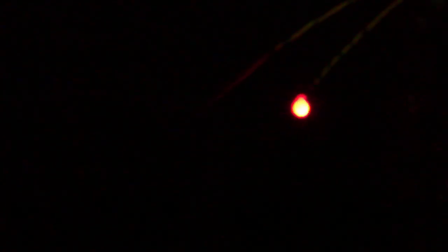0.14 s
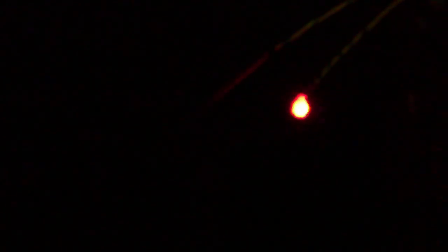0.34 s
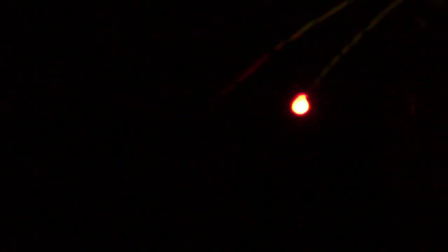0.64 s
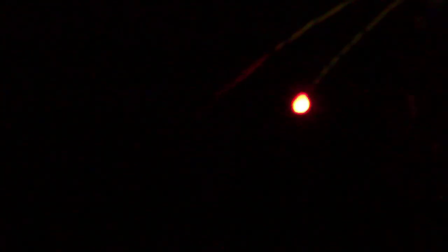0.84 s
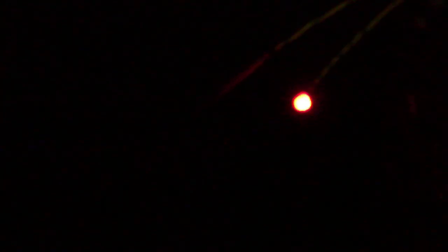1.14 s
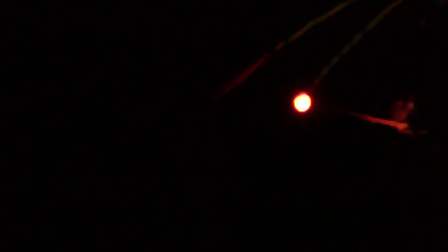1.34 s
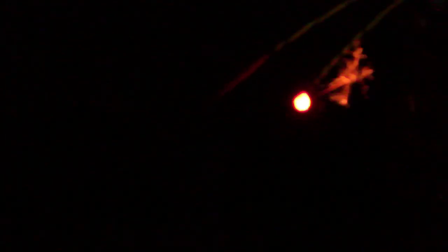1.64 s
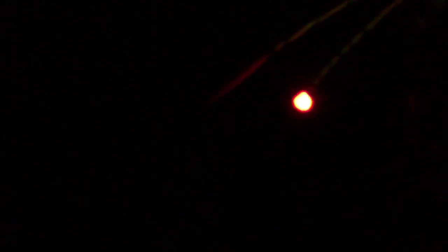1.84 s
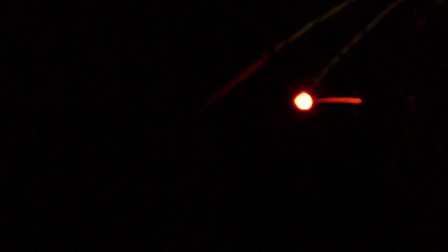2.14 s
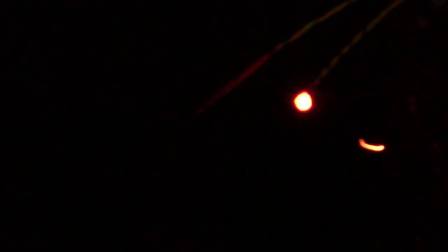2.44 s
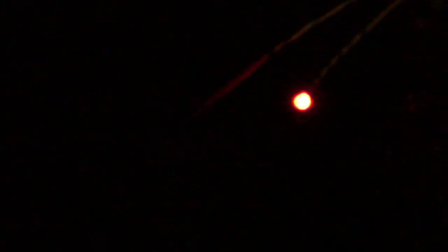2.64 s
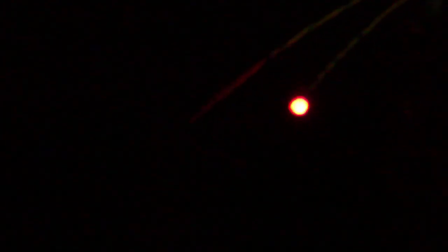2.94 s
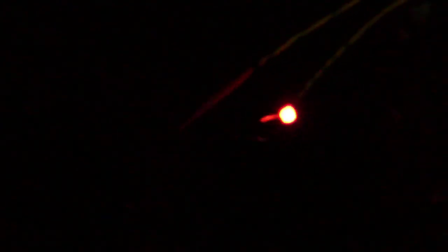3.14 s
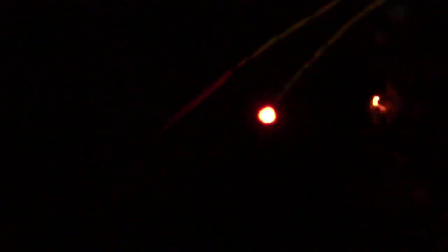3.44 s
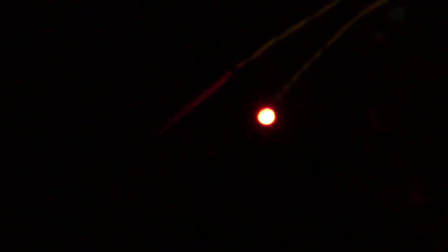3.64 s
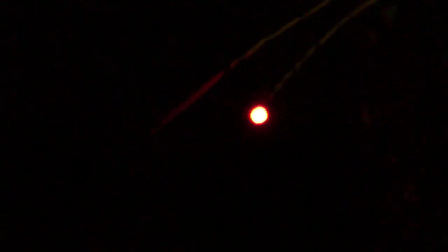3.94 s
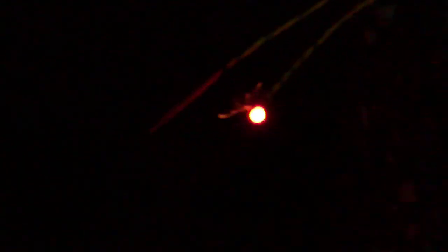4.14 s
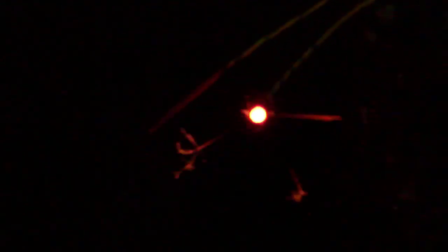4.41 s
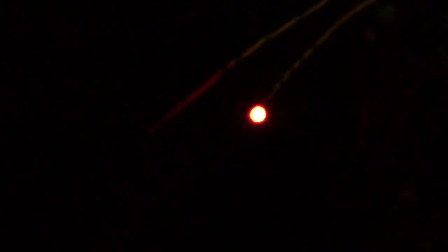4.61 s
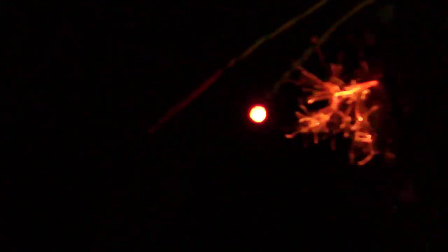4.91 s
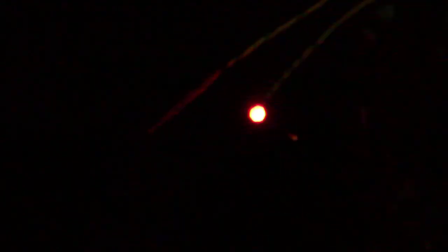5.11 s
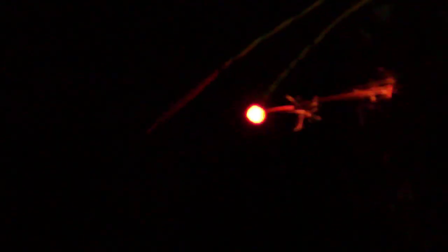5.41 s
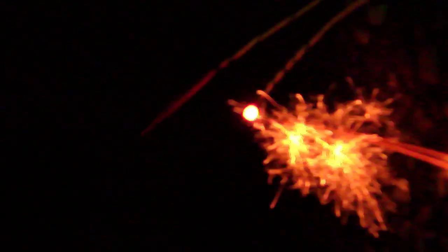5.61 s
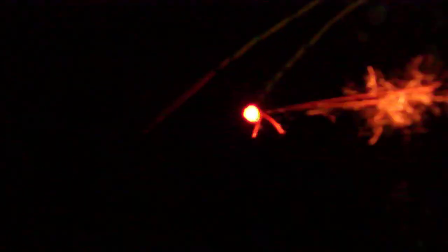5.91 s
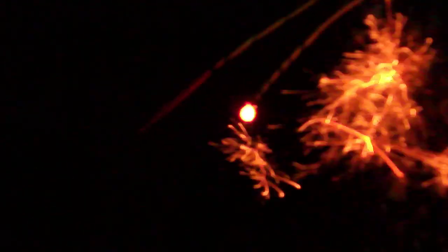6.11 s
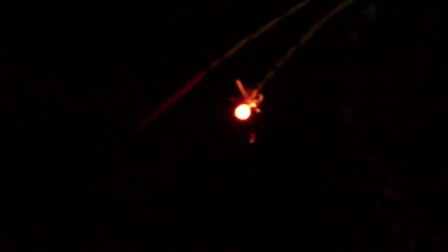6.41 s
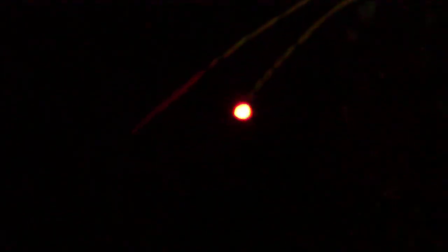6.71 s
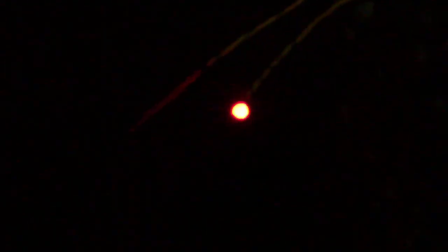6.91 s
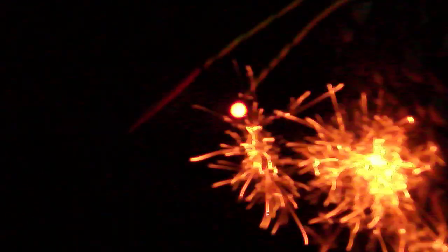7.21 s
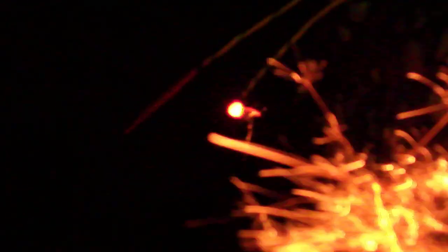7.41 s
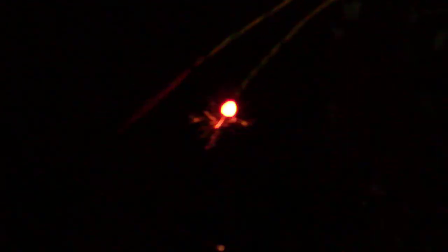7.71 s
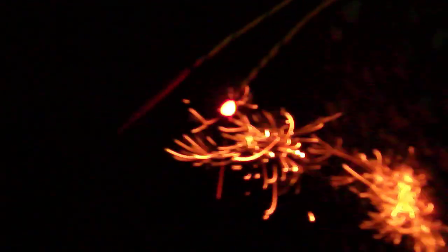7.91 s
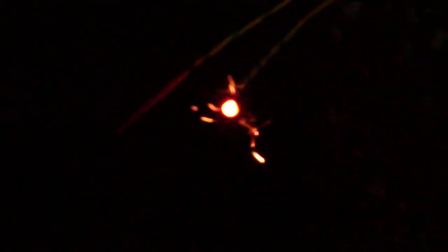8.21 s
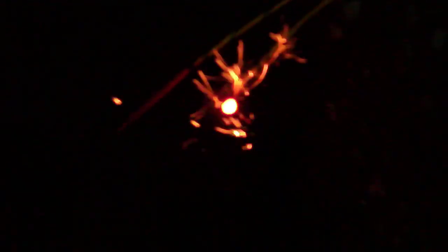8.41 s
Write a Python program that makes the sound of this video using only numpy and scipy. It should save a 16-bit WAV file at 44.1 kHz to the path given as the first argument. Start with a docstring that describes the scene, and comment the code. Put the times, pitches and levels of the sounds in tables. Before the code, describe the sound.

Deep town rumble and gentle hiss run throughout, with faint machine hums, an almost inaudible electronic whine and a distant engine dropping in pitch before twice picking up. Close to the stereo microphone, a handheld sparkler gives scattered crackling spurts, then much denser, louder ones, strongest a little past the middle. Small dull handling-like knocks and rare tiny ticks punctuate it; the bead's thin sizzle rises late. Open air, almost no echo.

```python
"""A thread sparkler burns close by, outdoors at night, heard in stereo through two microphone ports.
From the start the town rumbles under a hiss, with machine hums, a distant engine and a thin electronic whine:
shaped noise and wandering sines. The bead's quiet sizzle of short puffs grows late on; lone bubbles tick.
Soon droplets burst into showers, clumps of random snaps that swell and burn out; they crowd in after 3 s.
A few damped knocks fall between, and the engine slows, then twice picks up again."""
import sys
import numpy as np
from scipy import signal
from scipy.fft import rfft, irfft
from scipy.io import wavfile
from scipy.ndimage import uniform_filter1d

SR = 44100
rng = np.random.default_rng(int(sys.argv[2]) if len(sys.argv) > 2 else 0)


def dump_mix(stems):
    """Bounce the given channels to the path in sys.argv[1] as a 16-bit WAV at rate SR."""
    frames = np.atleast_2d(stems).T  # one column per channel
    limited = np.clip(frames, -1, 1)  # hard clip at full scale
    pcm = np.round(limited * 32767).astype(np.int16)
    wavfile.write(sys.argv[1], SR, pcm)


N = 377055
TIME, FREQS = np.arange(N) / SR, np.fft.rfftfreq(N, 1 / SR)  # s, Hz

# treble colour of sparks, sizzle and ticks: [frequency_hz, relative_density_db]
FIZZ_COLOUR = [(3300, -34), (4300, -14), (4900, -4.5), (6100, .5), (6900, -2), (8000, 1), (9000, -6.5),
               (10000, -7.5), (11000, -13), (12500, -17.5), (14500, -21.5), (15800, -26)]


def amp(db):
    """Decibels to amplitude."""
    return 10 ** (np.asarray(db) / 20)


def unit(x):
    """Scale a sound to an rms of 1."""
    return x / np.sqrt(np.mean(x ** 2) + 1e-20)


def read(points, hz):
    """A spectrum, joined by straight lines on a log-frequency axis."""
    f, value = np.transpose(points)
    return np.interp(np.log(hz + 1), np.log(f + 1), value)


def curve(rows, axis=1):
    """One column of a table of times, at every sample."""
    rows = np.asarray(rows)
    return np.interp(TIME, rows[:, 0], rows[:, axis])


def add(mix, start_s, sound):
    """Lay a sound into the mix, cut where the mix ends."""
    part = mix[max(round(start_s * SR), 0):][:len(sound)]
    part += sound[:len(part)]


def noise(gain):
    """Noise of rms 1 with the given gain at each frequency."""
    return unit(irfft(rfft(rng.standard_normal(N)) * gain, N))


def drift(hz):
    """Slow random wander of rms 1, mostly below the given rate."""
    return noise(1 / (1 + (FREQS / hz) ** 4))


def colour(x, points, size=2048):
    """A causal minimum-phase filter of energy 1: clicks keep their sharp fronts."""
    hz = abs(np.fft.fftfreq(size, 1 / SR))
    log_gain = np.log(amp(read(points, hz)))
    spectrum = np.exp(signal.hilbert(log_gain).conj())
    ring = np.fft.ifft(spectrum).real[:size // 2]
    return signal.oaconvolve(x, ring / np.linalg.norm(ring))[:N]


def snaps(per_s, spread_db, size=N):
    """Pops at random moments, of either sign and uneven size, with mean power 1."""
    height = amp(spread_db * np.minimum(rng.exponential(1, size), 4))
    sign = rng.choice([-1., 1.], size)
    return unit(height * sign * (rng.random(size) < per_s / SR))


def tones(rows, waver_db):
    """Sines whose pitch wanders over their width while their level wavers together."""
    out = np.zeros(N)
    for hz, db, width_hz in rows:
        phase = 2 * np.pi * np.cumsum(hz + width_hz / 2 * drift(width_hz)) / SR
        out += np.sqrt(2) * amp(db) * np.sin(phase)
    return out * amp(waver_db * drift(3.9))


def rumble(trim_db=3.5, swell_db=0.74):
    """The town's low rumble: bass-heavy noise that settles early, then nearly holds, swelling at random."""
    # colour of the town: [frequency_hz, relative_density_db]
    rumble_colour = [(12, -16), (25, -5), (45, -0.5), (70, -4), (100, -4.5), (130, -11), (165, -9),
                     (200, -10.5), (280, -17), (400, -22), (700, -27.5), (1100, -30.5), (1600, -41),
                     (2500, -65)]
    # level before the trim: [time_s, level_db]
    rumble_level = [(0, -38.7), (.8, -41), (4.5, -43), (8.55, -43.3)]
    level_db = trim_db + curve(rumble_level) + swell_db * drift(5.5)
    return amp(level_db) * noise(amp(read(rumble_colour, FREQS)))


def hiss(waver_db=0.39):
    """Soft broadband noise that sinks slowly, with a slight waver."""
    # colour of the hiss: [frequency_hz, relative_density_db]
    hiss_colour = [(900, -10), (1500, 0.9), (2200, 2.5), (3000, -2), (3800, -8), (4400, -13), (5500, -12.5),
                   (6700, -14), (7400, -7), (8600, -12), (9800, -7), (11000, -17), (12500, -24),
                   (15800, -30)]
    # slow fall before the waver: [time_s, level_db]
    hiss_level = [(0, -55), (1.5, -57), (8.55, -58.5)]
    level_db = curve(hiss_level) + waver_db * drift(11)
    return amp(level_db) * noise(amp(read(hiss_colour, FREQS)))


def engine(trim_db=-0.6, octave_db=-22):
    """Distant engine: only the firing note and a trace of its octave carry this far."""
    # firing note, easing off and twice picking up; level before the trim: [time_s, pitch_hz, level_db]
    engine_course = [(0, 54.37, -32), (.95, 52.98, -30.5), (1.33, 41.7, -27.5), (2.5, 38.02, -29.5),
                     (3.1, 30, -46), (4.0, 27, -46), (4.5, 38, -43.5), (5.65, 40, -43), (5.8, 46.03, -33.5),
                     (6.2, 60.48, -35), (6.8, 44.96, -32.5), (7.4, 36, -44), (7.8, 49.03, -33),
                     (8.15, 54.77, -33.5), (8.55, 56.3, -32.5)]
    phase = 2 * np.pi * np.cumsum(curve(engine_course)) / SR
    note = np.sin(phase) + amp(octave_db) * np.sin(2 * phase)
    return np.sqrt(2) * amp(trim_db + curve(engine_course, axis=2)) * note


def hums():
    """Far machines: low tones that wander in pitch and waver in level."""
    # machine tones before the waver: [pitch_hz, level_db, width_hz]
    hum_tones = [(29.2, -46.5, 2), (45.1, -42, 3.9), (219, -56.5, 6.1), (301, -58.5, 5.98)]
    return tones(hum_tones, waver_db=2.0)


def whine():
    """Electronics: thin, high tones, nearly even in level."""
    # electronic tones before the waver: [pitch_hz, level_db, width_hz]
    whine_tones = [(6143, -80, 20), (9022, -77, 6), (9092, -78, 10), (11367, -70, 1), (11397, -79.5, 12),
                   (11400, -82, 90)]
    return tones(whine_tones, waver_db=0.4)


def sizzle(puffs_per_s=55, puff_s=.0016, spread_db=1.5, steady_power=0.31):
    """Tiny droplets burn out in a single short puff each, over a steady bed of fine snaps."""
    # growth as the bead burns down, before the steady bed and the band trims: [time_s, level_db]
    sizzle_level = [(0, -69), (3, -68.5), (7.6, -64.5), (8.1, -59.5), (8.55, -59)]
    decay = np.exp(-np.arange(900) / SR / puff_s)
    puffs = signal.oaconvolve(snaps(puffs_per_s, spread_db) ** 2, decay)[:N]
    power = abs(puffs) / np.mean(puffs) + steady_power
    return amp(curve(sizzle_level)) * np.sqrt(power) * snaps(8000, 2.5)


def ticks(per_s=7, db=-78):
    """Now and then a lone gas bubble pops on the bead."""
    return amp(db) * colour(snaps(per_s, 1.5), FIZZ_COLOUR)


def shower(size, snaps_per_s=6500, spread_db=3.8, echo=0.27, echo_s=.004, clump_db=1.28):
    """The crackle of one droplet: clumps of snaps, coloured by early echoes of the spot where it bursts."""
    pops = snaps(snaps_per_s, spread_db, size)
    delays_s = rng.uniform(.0003, echo_s, 3)
    echoes = sum(echo * np.roll(pops, round(delay * SR)) for delay in delays_s)
    pops = unit(pops + echoes)
    # the snaps share out the droplet's fuel: crowded ones are weaker
    pops /= np.sqrt(abs(uniform_filter1d(pops ** 2, size=300)) + 0.069)
    clumps = unit(uniform_filter1d(rng.standard_normal(size), size=130))
    return pops * amp(clump_db * clumps)


def flare(t, length_s, swell_share=0.62, power=1.94):
    """A shower's envelope round its height at t = 0: slow swell, quick end, each to 1/e in its share."""
    share = np.where(t < 0, swell_share, 1 - swell_share)
    return np.exp(-(abs(t) / (length_s * share)) ** power)


def depth(peak_s, length_s):
    """Lower against upper body of a shower (dB): long showers are deeper, and so are late ones."""
    doublings = np.log2(length_s / .025)  # against a typical length of 25 ms
    age_s = peak_s - 5  # against a bead of middling age
    return .1 + 1.1 * doublings + .45 * age_s


def sparks(body_db=0.22, fizz_db=0.2, split_hz=1400, sizzle_body_db=-.5, sizzle_fizz_db=-3.3):
    """Each droplet splits again and again, so its snaps swell, then die as the branches burn out."""
    # one row a shower, level before clumping and band trims: [peak_s, level_db, length_s, fizz_against_body_db]
    showers = [(0.128, -54.5, 0.0056, 3.5), (0.188, -44.5, 0.012, -7), (0.688, -40.5, 0.037, -6),
               (1.319, -48, 0.016, -8), (1.43, -48.0, 0.065, -5.5), (1.476, -39.0, 0.037, -7),
               (1.616, -45.5, 0.013, -9), (1.845, -49.5, 0.006, -4), (2.151, -41.5, 0.02, -7.5),
               (2.166, -41.5, 0.032, -8.5), (2.307, -40.0, 0.026, -10), (2.355, -44.0, 0.032, -4.5),
               (2.53, -42.0, 0.014, -7), (2.679, -46.5, 0.014, -2.5), (2.726, -47.5, 0.022, -10.5),
               (3.165, -51, 0.07, -9), (3.2, -39.5, 0.038, -9), (3.238, -37.5, 0.055, -8.5),
               (3.268, -38, 0.017, -13), (3.302, -51, 0.0065, -4), (3.365, -47.5, 0.007, 0.5),
               (3.377, -43.5, 0.023, -6), (3.796, -43.5, 0.01, -5), (4.018, -48, 0.045, -7),
               (4.042, -35.5, 0.017, -9), (4.076, -37.5, 0.056, -7), (4.098, -38.5, 0.031, -12),
               (4.146, -45.5, 0.016, -8), (4.216, -41.0, 0.013, -11), (4.247, -45.5, 0.032, -6),
               (4.285, -40.5, 0.038, -9), (4.409, -44.0, 0.023, -7.5), (4.437, -49.0, 0.013, -16),
               (4.502, -47.0, 0.014, -5), (4.611, -44.5, 0.022, -10), (4.703, -39.5, 0.025, -5),
               (4.721, -39.0, 0.015, -7), (4.788, -44.5, 0.013, -10), (4.827, -49.0, 0.01, -2.5),
               (4.855, -43.5, 0.012, -7), (4.871, -39.5, 0.017, -8), (4.907, -40.5, 0.024, -7),
               (4.992, -37.0, 0.032, -6.5), (5.154, -48.5, 0.007, -15), (5.199, -46.5, 0.009, -2),
               (5.26, -42, 0.0083, -11), (5.356, -48.0, 0.009, -3), (5.373, -39.0, 0.013, -9),
               (5.416, -36.0, 0.023, -7.5), (5.547, -43.0, 0.016, -10), (5.563, -34.0, 0.012, -11),
               (5.585, -30.5, 0.026, -11), (5.636, -44.0, 0.017, -5), (5.682, -34.5, 0.026, -13),
               (5.792, -37.5, 0.041, -9.5), (5.805, -37, 0.02, -15), (5.872, -39.5, 0.029, -9),
               (5.891, -41.5, 0.024, -9), (5.96, -40.5, 0.022, -6), (6.05, -40.0, 0.028, -8),
               (6.071, -36.5, 0.026, -11.5), (6.162, -48.5, 0.07, -10), (6.208, -40.5, 0.052, -10),
               (6.246, -37.5, 0.023, -11), (6.262, -36.0, 0.016, -11), (6.471, -40, 0.021, -9.5),
               (6.51, -42.5, 0.024, -10), (6.54, -34.5, 0.02, -14), (6.583, -41.5, 0.015, -5.5),
               (6.937, -43.0, 0.053, -10), (6.981, -39.0, 0.041, -8), (7.15, -36.5, 0.03, -8.5),
               (7.311, -43, 0.018, -8), (7.354, -37.0, 0.029, -9.5), (7.429, -41.5, 0.035, -9),
               (7.461, -38.5, 0.022, -14.5), (7.586, -39.5, 0.026, -7), (7.6, -42.0, 0.018, -6),
               (7.72, -42.0, 0.024, -5), (7.738, -43.5, 0.012, -10), (7.849, -39.5, 0.026, -7),
               (7.896, -43.0, 0.028, -9), (7.953, -42, 0.0085, -8.5), (7.99, -49.0, 0.025, -8),
               (8.076, -42.5, 0.041, -13), (8.112, -41.0, 0.022, -8.5), (8.216, -51.0, 0.07, -10),
               (8.402, -41.0, 0.021, -10.5)]
    # colour of body snaps: [frequency_hz, relative_density_db]
    body_colour = [(200, -22.5), (380, -4.5), (550, 2.5), (780, 0.2), (1020, -2.5), (1250, -2.5),
                   (1600, -7), (1900, 0.1), (2450, -2.5), (3000, -9.5), (3500, -15), (4300, -26.5),
                   (5500, -50)]
    # three layers, lower body, upper body and treble, each begun by the sizzle
    bead = sizzle()
    deep, crack = amp(sizzle_body_db) * bead, amp(sizzle_body_db) * bead
    fizz = amp(sizzle_fizz_db) * bead
    t = np.arange(-SR // 10, SR // 10) / SR
    for peak_s, db, length_s, treble_db in showers:
        depth_db = depth(peak_s, length_s)
        crackle = amp(db) * flare(t, length_s) * shower(len(t))
        start_s = peak_s + t[0]
        add(deep, start_s, crackle * amp(body_db + depth_db / 2))
        add(crack, start_s, crackle * amp(body_db - depth_db / 2))
        add(fizz, start_s, crackle * amp(fizz_db + treble_db))
    below = 1 / (1 + (FREQS / split_hz) ** 6)
    body = irfft(below * rfft(deep) + (1 - below) * rfft(crack), N)
    return colour(body, body_colour) + colour(fizz, FIZZ_COLOUR)


def knocks(attack_s=0.00047):
    """Brief, heavily damped rattles: random-phase noise round one resonance, dying exponentially."""
    # small knocks, level before attack and decay: [start_s, level_db, ring_hz, width_hz, t60_s]
    knock_rows = [(.481, -38.5, 1800, 1200, .015), (1.414, -38, 700, 450, .04),
                  (2.936, -41, 1198, 600, 0.022), (2.989, -36.5, 800, 600, .035),
                  (3.005, -38.5, 2800, 1100, .01), (3.114, -36, 750, 498, 0.032),
                  (6.769, -32, 2280, 300, 0.019), (6.772, -38.5, 998, 450, .06),
                  (7.782, -47, 1050, 130, .1)]
    out, t = np.zeros(N), np.arange(4096) / SR
    hz = np.fft.rfftfreq(len(t), 1 / SR)
    for start_s, db, ring_hz, width_hz, t60_s in knock_rows:
        resonance = 1 / (1 + ((hz - ring_hz) / width_hz) ** 2)
        random_phase = np.exp(2j * np.pi * rng.random(len(hz)))
        ring = unit(irfft(resonance * random_phase, len(t)))
        envelope = amp(db - 60 * t / t60_s) * (1 - np.exp(-t / attack_s))
        add(out, start_s, ring * envelope)
    return out


def surroundings(x, db=-13, t60_s=0.088):
    """Weak, short reflections from the ground and things nearby: sparse random taps that die away."""
    t = np.arange(SR // 4) / SR
    hits = (rng.random(len(t)) < 2000 / SR) * (t > .002)
    taps = rng.standard_normal(len(t)) * hits * amp(-60 * t / t60_s)
    return x + amp(db) * signal.oaconvolve(x, taps / np.linalg.norm(taps))[:N]


def ports(airborne, electronic):
    """Two close ports: alike in the bass, apart in phase in the treble; the sound's direction flits about."""
    # phase by which left leads right: [frequency_hz, phase_rad]
    port_phase = [(450, 0), (1400, -0.11), (2100, -0.18), (3200, -0.3), (4400, -0.6), (5300, -.66),
                  (8000, -1.05), (11000, -1.5), (13500, -2), (16000, -1.5)]
    # scattered sound that enters the ports in opposite sign: [frequency_hz, level_db]
    port_apart = [(100, -90), (300, -63), (600, -39.5), (1300, -35), (2000, -23), (3000, -17.5),
                  (5000, -12), (7500, -11.5), (10500, -8), (13000, -1), (15000, 2)]
    phase = np.clip(read(port_phase, FREQS), -2.7, 2.7)
    apart = amp(read(port_apart, FREQS)) * rfft(airborne * drift(150))
    mid = rfft(airborne + electronic)
    side = mid * 1j * np.tan(phase / 2) + apart
    return irfft(np.array([mid + side, mid - side]), N)


def scene():
    """The sparkler close by and the night behind it, at the two microphone ports."""
    far = rumble() + hiss() + engine() + hums()
    near = surroundings(sparks() + ticks() + knocks())
    return ports(near + far, whine())


def record(dry, edge_hz=15750):
    """The recorder's band limit: a steep low-pass on both channels."""
    lowpass = signal.firwin(511, edge_hz, window=("kaiser", 9), fs=SR)
    return signal.oaconvolve(dry, lowpass[None], "same")


dry = scene()
out = record(dry)
dump_mix(out)
```